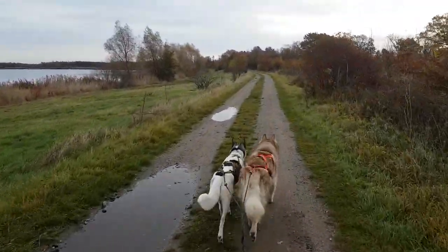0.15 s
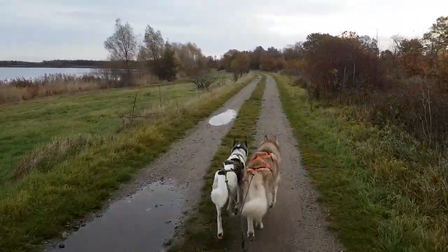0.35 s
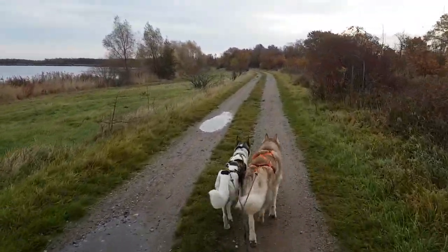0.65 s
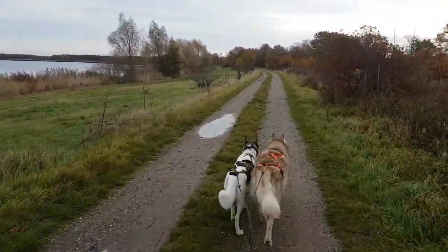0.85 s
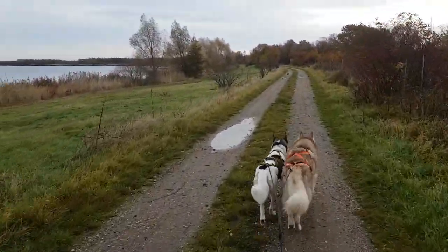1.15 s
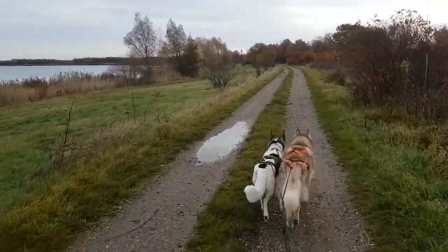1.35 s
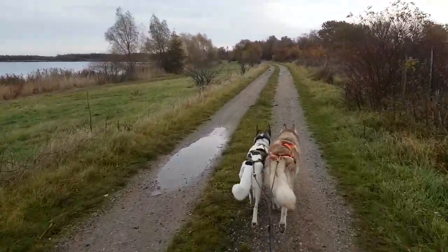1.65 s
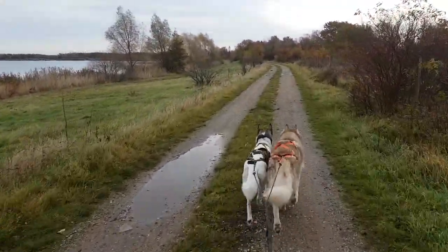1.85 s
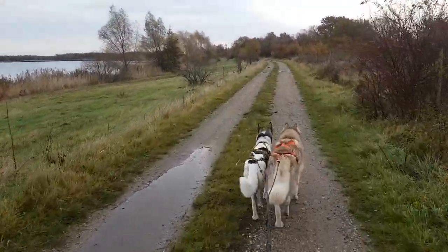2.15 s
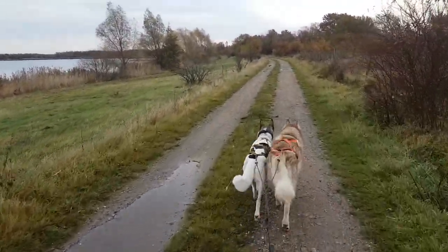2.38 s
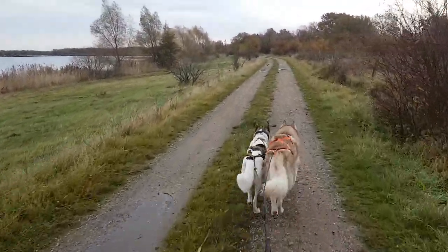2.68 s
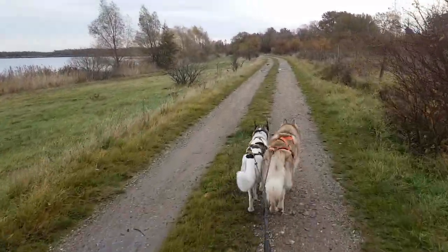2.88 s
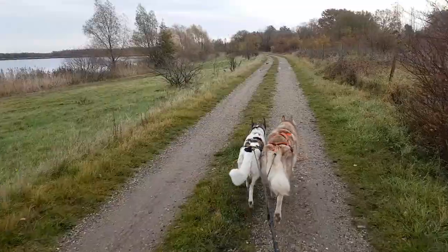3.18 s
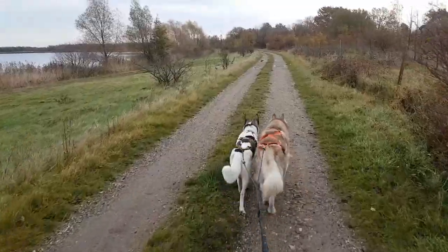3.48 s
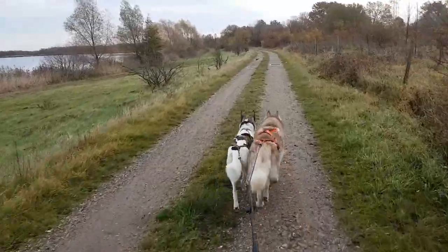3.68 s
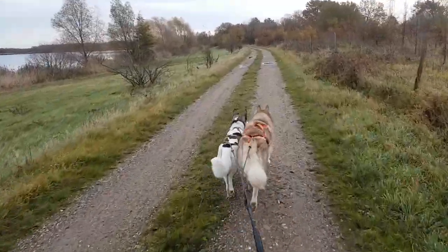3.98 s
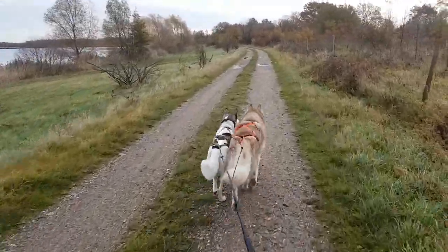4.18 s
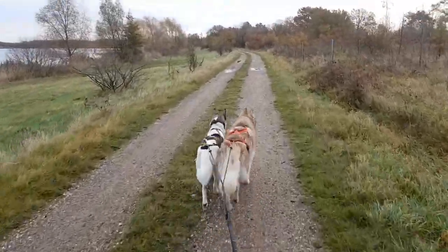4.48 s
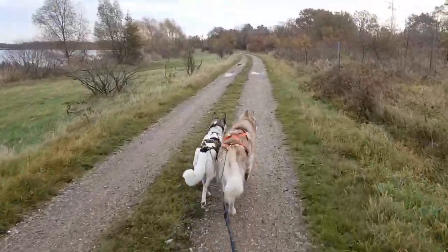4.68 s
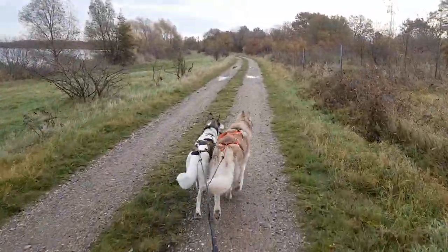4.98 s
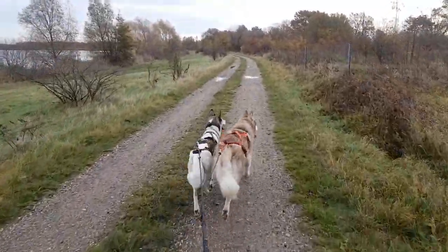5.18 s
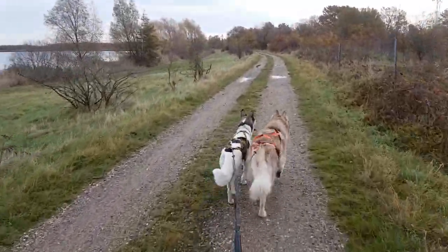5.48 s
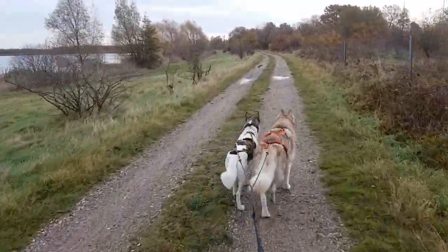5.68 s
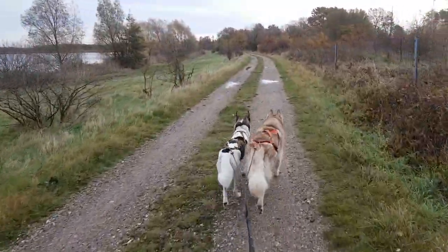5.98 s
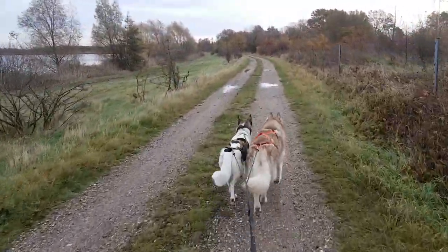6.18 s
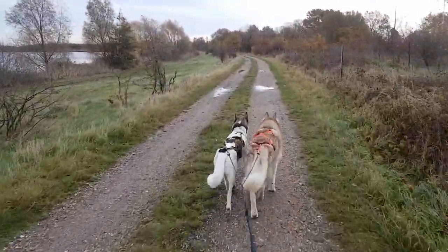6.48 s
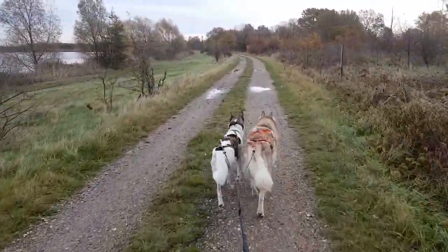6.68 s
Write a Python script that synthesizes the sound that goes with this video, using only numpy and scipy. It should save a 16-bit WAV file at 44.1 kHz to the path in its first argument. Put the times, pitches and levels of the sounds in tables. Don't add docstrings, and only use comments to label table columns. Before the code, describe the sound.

Continuous gritty gravel crunch under rolling wheels, peppered with sharp clicks and snaps, faint dull thuds and low fluttering air.

```python
import sys
import numpy as np
from scipy import signal
from scipy.fft import rfft, irfft, next_fast_len
from scipy.io import wavfile
from scipy.ndimage import map_coordinates

SR = 44100
rng = np.random.default_rng(int(sys.argv[2]) if len(sys.argv) > 2 else 0)


def field_ratio(decibels):
    return 10 ** (np.asarray(decibels, dtype=float) / 20)


def bounce(signal):
    frames = np.transpose(np.atleast_2d(signal))
    limited = np.clip(frames, -1, 1)
    pcm = np.round(limited * 32767).astype(np.int16)
    wavfile.write(sys.argv[1], SR, pcm)


N = 302085

# time in seconds, crunch level in dB.
LOOSE_GRAVEL = [(0.0, -52), (0.18, -48), (0.25, -45.5), (0.85, -49.5), (1.05, -53), (1.3, -59), (1.42, -48),
                (1.6, -50), (1.95, -45.5), (2.5, -45.5), (2.85, -44.5), (3.05, -47.5), (3.4, -42),
                (4.15, -46.5), (4.75, -47), (4.9, -43), (6.0, -46), (6.85, -41)]
# start in seconds, peak in dB, pitch of the ring in Hz.
BIG_STONES = [(0.3126, -18, 2070), (0.3782, -21, 3320), (0.41, -22, 3340), (1.692, -22.5, 4110),
              (1.9068, -19, 3280), (1.9665, -16, 2460), (2.0186, -19.5, 3660), (2.0785, -21, 2480),
              (2.1017, -21, 2430), (2.3181, -18, 3350), (2.3202, -13.5, 1020), (2.3237, -17.5, 3300),
              (2.4668, -11.5, 2460), (2.6475, -26, 3830), (2.789, -22.5, 1900), (2.791, -16, 5340),
              (2.8823, -20.5, 2370), (2.9864, -21, 3400), (3.22, -20.5, 3200), (3.293, -23.5, 2400),
              (3.384, -19, 2960), (3.4542, -21, 2670), (3.58, -14, 3180), (4.0823, -19, 4350),
              (4.1761, -21, 4360), (4.8142, -20, 1480), (4.9492, -22, 3100), (5.2, -22, 1950),
              (6.433, -22, 2200), (6.4355, -15, 2860)]
# start in seconds, peak in dB.
SMALL_STONES = [(0.2532, -28.5), (0.5545, -25), (1.39, -25), (1.4647, -25), (1.5294, -21), (1.737, -32),
                (1.8742, -29), (2.2176, -20), (2.4544, -23), (2.6035, -25), (2.6318, -21), (2.7385, -27),
                (2.8322, -25), (2.926, -23), (3.146, -23), (3.6809, -33), (3.796, -22.5), (3.9024, -22.5),
                (4.3697, -26), (4.5533, -24), (4.6562, -25), (5.5056, -30), (5.6761, -21), (5.8157, -25.5),
                (6.0898, -22.5), (6.273, -27), (6.3117, -23), (6.5985, -22), (6.7273, -23), (6.8045, -27.5)]
# start in seconds, peak in dB, length in seconds.
CRUMBLING = [(0.378, -25, .006), (0.415, -32.5, .009), (1.519, -30.5, 0.03), (1.677, -25.5, 0.026),
             (2.096, -24.5, 0.017), (2.308, -24, 0.015), (2.472, -29, 0.011), (2.958, -28, 0.011),
             (2.98, -29, .015), (3.286, -27.5, 0.017), (3.155, -28.5, 0.0077), (5.486, -33.5, 0.047),
             (6.26, -28.5, 0.013), (1.381, -31, .014), (3.364, -34, 0.062), (6.207, -29.5, .025),
             (1.953, -28.5, 0.028)]
# frequency in Hz, left-right likeness (1 is the same).
PORT_LIKENESS = [(300, 1), (1050, 0.85), (1800, 0.33), (2300, 0.76), (3400, 0.82), (4300, 0.4),
                 (5500, 0.23), (8000, 0.075)]


def unit(x):
    return x / np.sqrt(np.mean(x ** 2) + 1e-20)


def along(points, hz):
    f, v = np.transpose(points)
    return np.interp(np.log(hz + 1), np.log(f + 1), v)


def wobble(rate):
    return map_coordinates(rng.standard_normal(int(N * rate / SR) + 4), [np.arange(N) * rate / SR])


def swells(rows):
    out = np.zeros(N)
    for s, db, width in rows:
        first = max(0, round((s - 3 * width) * SR))
        last = min(N, round((s + 3 * width) * SR))
        near = np.arange(first, last)
        out[near] += db * np.exp(-.5 * ((near / SR - s) / width) ** 2)
    return out


def causal(spectrum, size):
    cepstrum = irfft(np.log(field_ratio(along(spectrum, np.fft.rfftfreq(size, 1 / SR)))), size)
    cepstrum[1:size // 2] *= 2
    cepstrum[size // 2 + 1:] = 0
    return np.exp(rfft(cepstrum))


def heard(pair, spectrum, alike):
    size = 2 * next_fast_len(pair.shape[1] // 2 + 4096)
    hz = np.fft.rfftfreq(size, 1 / SR)
    turn = np.arccos(np.clip(along(alike, hz), -1, 1)) / 2
    mid, side = rfft(pair, size) * causal(spectrum, size) * [np.cos(turn), np.sin(turn)]
    return irfft(np.array([mid + side, mid - side]), size)[:, :pair.shape[1]]


def contacts(per_second, spread_db, t60, clump, bed):
    chance, size = rng.random((2, N))
    starts = (chance < per_second * clump / SR) * field_ratio(-spread_db * np.log(size + 0.068))
    fade = field_ratio(-60 / (t60 * SR))
    bursts = unit(signal.lfilter([1], [1, -fade], starts))
    swell = np.sqrt(bursts ** 2 + bed * np.sqrt(clump))
    return swell * rng.standard_normal((2, N))


def looseness():
    # centre in seconds, change in dB, width in seconds.
    hard_patches = [(.15, -4.5, 0.025), (.66, -1.5, 0.049), (1.6, -4, .04), (1.43, -3.5, 0.014),
                    (2.28, -1.5, 0.046), (2.54, -4, 0.027), (2.95, -4, 0.008), (3.34, -6, 0.023),
                    (3.53, -5, 0.047), (3.74, -1.5, 0.023), (4.0, -3, 0.027), (4.21, -6, .02),
                    (4.345, -7, 0.017), (4.58, -2, 0.046), (4.78, -9, 0.024), (5.1, -2.5, 0.084),
                    (5.31, -6, 0.038), (5.6, -2.5, 0.09), (6.02, -8, 0.02), (6.15, -3.5, 0.011),
                    (6.38, 0, 0.026), (6.66, -3, 0.067), (6.85, -5.5, 0.038), (1.72, 0.5, 0.013),
                    (3.96, -0.5, .03), (5.06, 2, 0.014), (.35, -2, .02), (.49, -0.5, .03)]
    grind_s, grind_db, grind_from_db = 0.006, 0.1855, -26.5
    rises = []
    for s, db, *_ in [*BIG_STONES, *SMALL_STONES]:
        rises.append((s, grind_db * (min(db, -20) - grind_from_db), grind_s))
    for s, _, length in CRUMBLING:
        rises.append((s + length / 2, 1.5, length / 2 + 0.0035))
    lie_s, lie_db = np.transpose(LOOSE_GRAVEL)
    lie = np.interp(np.arange(N) / SR, lie_s, lie_db)
    uneven = 1.05 * wobble(12)
    crunch_db = lie - .8 + uneven + swells(rises) + swells(hard_patches)
    grit_db = -54.5 + 0.31 * (crunch_db + 48) + 0.55 * wobble(3.2)
    return crunch_db, grit_db


def crunch(crunch_db, grit_db):
    # frequency in Hz, level in dB per Hz.
    gravel_tone = [(290, -51.5), (500, -11), (794, -14.5), (1060, -10), (1420, -8.5), (1890, -5.5),
                   (2280, 1), (2600, -2), (3000, 1.5), (3450, 0.5), (3900, -3.5), (6200, -14.5),
                   (6900, -24), (16000, -24)]
    grit_tone = [(3000, -42), (5000, 0), (6300, 0.5), (7200, -1.5), (9000, 1), (10500, -1), (12500, -13),
                 (16000, -29)]
    dust_tone = [(8000, -32), (11000, -9), (12500, -2.5), (16000, -4)]
    clump = field_ratio(.8 * wobble(30) + 3.2 * wobble(75))
    coarse = fine = 0
    for tilt_db in (-4, 4):
        colour = [(hz, db + tilt_db * np.log2(hz / 2800)) for hz, db in gravel_tone]
        own = clump * field_ratio(2.2 * wobble(35))
        touches = contacts(520, spread_db=2.5, t60=0.002, clump=own, bed=0.69)
        coarse = coarse + heard(touches, colour, PORT_LIKENESS)
    for colour in (grit_tone, dust_tone):
        own = clump ** 0.65 * field_ratio(1.4 * wobble(30))
        touches = contacts(640, spread_db=10.5, t60=0.021, clump=own, bed=0.67)
        fine = fine + heard(touches, colour, [(8000, 0.025)])
    return field_ratio(crunch_db + 2.0) * unit(coarse) + field_ratio(grit_db + 0.5) * unit(fine)


def pebble_hz(z):
    return 3100 * np.exp(0.4 * z)


def cracks():
    first = [*BIG_STONES]
    for (s, db), z in zip(SMALL_STONES, rng.standard_normal(len(SMALL_STONES))):
        first.append((s, db, pebble_hz(z)))
    nudge_s, nudge_db, nudge_scatter_db = .014, -11.5, 4
    nudged = []
    for (s, db, _), (a, b, c) in zip(first, rng.standard_normal((len(first), 3))):
        peak_db = min(db, -20) + nudge_db + nudge_scatter_db * b
        nudged.append((s + nudge_s * a, peak_db, pebble_hz(c)))
    runs = []
    for s, db, length in CRUMBLING:
        for u, (a, b, c) in zip(np.linspace(0, 1, num=6), rng.standard_normal((6, 3))):
            peak_db = db - .7 - 6 * (u - .5) ** 2 + 1.3 * b
            runs.append((s + length * (u + .08 * a), peak_db, pebble_hz(c)))
    lie_s, lie_db = np.transpose(LOOSE_GRAVEL)
    strays = []
    for s, (b, c) in zip(rng.uniform(.01, 6.8, size=170), rng.standard_normal((170, 2))):
        strays.append((s, np.interp(s, lie_s, lie_db) + 15.5 + 2.5 * b, pebble_hz(c)))
    return first + nudged + runs + strays


def stones():
    # frequency in Hz, level in dB per Hz.
    crack_tone = [(300, -29), (800, -10), (1500, -6), (2300, 1), (2600, -1), (3000, 3), (3450, 3),
                  (4000, -2), (6000, -11), (8000, -19), (16000, -25)]
    drive, t = np.zeros((2, N + SR)), np.arange(1500) / SR
    rows = cracks()
    draws = rng.standard_normal((len(rows), 2, len(t)))
    for (s, db, hz), noise in zip(rows, draws):
        ring = np.cos(2 * np.pi * hz * t) * field_ratio(-60 * t * hz / 14)
        push = field_ratio(-60 * t / 0.00026) + 0.21 * ring
        splinters = noise * (0.14 * field_ratio(-60 * t / 0.006) + 0.054 * field_ratio(-60 * t / 0.071))
        off_centre = [[1], [noise[1, -1]]]
        start = round((s - .0002) * SR)
        drive[:, start:][:, :len(t)] += field_ratio(db + 7.5) * (off_centre * push + splinters)
    return heard(drive[:, :N], crack_tone, PORT_LIKENESS)


def knocks():
    # start in seconds, peak in dB, pitch of the ring in Hz.
    thuds = [(0.1365, -44.5, 724), (0.3121, -40, 1000), (0.4165, -46, 1060), (0.902, -40, 1000),
             (1.3927, -38, 905), (1.9067, -56, 890), (1.952, -39, 1060), (2.116, -34.5, 980),
             (2.2192, -42, 1060), (2.3192, -49, 1020), (2.4657, -62, 990), (2.788, -42, 1100),
             (3.3799, -34.5, 970), (3.5793, -56, 1040), (3.7405, -38, 676), (3.8898, -42, 740),
             (4.1807, -41, 630), (4.3697, -41, 955), (4.5396, -42, 845), (4.8153, -50, 1030),
             (4.9227, -37.5, 696), (5.0188, -41.5, 634), (6.2087, -45, 1020), (6.433, -50, 970)]
    out, t = np.zeros(N + SR), np.arange(SR // 50) / SR
    for s, db, hz in thuds:
        ring = np.sin(2 * np.pi * hz * t) * field_ratio(-60 * t * hz / 5)
        pull = 0.51 * np.sin(np.pi * hz * t) * field_ratio(-60 * t / 0.0042)
        out[round((s - .001) * SR):][:len(t)] -= field_ratio(db + 9) * (ring + pull)
    return out[:N]


def frame(shake):
    # pitch in Hz, level in dB.
    tubes = [(680, -9), (1050, -14), (1210, -10), (1570, -8.5), (1740, -9)]
    hz = np.fft.rfftfreq(N, 1 / SR)
    modes = 0
    for tube_hz, db in tubes:
        damping = 45j * hz
        modes = modes + field_ratio(db) * damping / (tube_hz ** 2 - hz ** 2 + damping)
    return irfft(rfft(shake.mean(axis=0)) * modes, N)


def spits():
    # start in seconds, peak in dB.
    sprays = [(0.3846, -41), (0.8296, -39), (1.3959, -42), (1.694, -40), (1.698, -40), (2.0777, -36),
              (2.1156, -40), (2.1878, -38), (2.1929, -40), (2.368, -33), (2.3736, -38), (2.4658, -38),
              (2.631, -39), (2.791, -39), (3.582, -40), (4.139, -35), (4.1765, -38), (4.4209, -42),
              (4.4309, -40), (4.7406, -42), (4.787, -42), (5.6532, -38), (4.93, -42), (6.47, -42),
              (3.42, -42), (5.915, -34), (5.917, -27.5), (5.921, -40), (6.0859, -40)]
    swell, t = np.zeros(N + SR), np.arange(SR // 20) / SR
    burst = t / 0.00089 * np.exp(1 - t / 0.00077) + field_ratio(-8.5 - 20 * t / 0.015)
    for s, db in sprays:
        swell[round((s - .0007) * SR):][:len(t)] += field_ratio(db) * burst
    colour = [(6500, -41), (9000, -4.5), (12000, -4), (16000, -5.0)]  # (Hz, dB per Hz)
    hiss = heard(rng.standard_normal((2, N)), colour, [(8000, 0.14)])
    return field_ratio(-3.0) * swell[:N] * unit(hiss)


def drum():
    # frequency in Hz, level in dB per Hz.
    hum_tone = [(150, -34), (230, -8), (330, 4), (420, -1.5), (560, -9.5), (900, -15), (1500, -19),
                (3000, -45)]
    # centre in seconds, dB over the usual hum, width in seconds.
    weight_swings = [(.43, 1, 0.028), (1.2, 2.5, 0.041), (2.0, 4.5, 0.033), (2.25, 5, 0.13),
                     (3.03, 3.5, 0.079), (3.57, 3, .06), (4.33, 3, 0.17), (4.9, 5.5, 0.05),
                     (5.28, 3.5, 0.043), (5.92, 4.5, 0.11), (6.65, 0, 0.11)]
    lumps = contacts(150, spread_db=4.0, t60=0.005, clump=0.86, bed=1.84)
    hum = unit(heard(lumps, hum_tone, [(250, 0.98), (600, 0.7)]))
    return field_ratio(-51.5 + swells(weight_swings) + 0.15) * hum


def buffet():
    # frequency in Hz, level in dB per Hz.
    wind_tone = [(12, -32), (25, -13.5), (60, -1.5), (105, -1), (200, -6.5), (350, -16), (600, -37),
                 (1500, -41)]
    # centre in seconds, dB over the calm, width in seconds.
    wind_gusts = [(.21, 5, 0.09), (.6, 7, 0.15), (1.21, 5.5, 0.088), (1.6, 9.5, 0.085), (1.74, 7, 0.033),
                  (1.87, 10.5, 0.074), (2.08, 4.5, 0.07), (2.43, 7, 0.1), (2.85, 10.5, 0.16),
                  (1.98, 6.5, 0.026), (3.28, 9.5, 0.054), (3.62, 12, 0.067), (3.86, 4, 0.033),
                  (4.86, 4, 0.019), (5.28, 10, 0.074), (5.53, 15, 0.034), (5.82, 3, 0.11), (6.2, 6, 0.17),
                  (6.48, 13.5, 0.037), (6.65, 10, 0.02), (6.85, 6, 0.035)]
    lumps = field_ratio(2.4 * np.array([wobble(17), wobble(17)]))
    rush = heard(rng.standard_normal((2, N)), wind_tone, [(60, 0.055), (200, 0.29)])
    return field_ratio(-58.5 + swells(wind_gusts) + 3.5) * unit(lumps * rush)


def scene():
    gravel = crunch(*looseness()) + stones() + knocks()
    return gravel + frame(gravel) + spits() + drum() + buffet()


def top_cut(x):
    return signal.sosfilt(signal.butter(12, 16830, fs=SR, output="sos"), x)


def record(dry):
    # frequency in Hz, left-right difference in dB.
    left_louder = [(60, 3.5), (125, 3.5), (330, -1.5), (1100, 1), (1700, -0.5), (2300, -4.5), (2900, -4),
                   (3800, 1), (5400, -4), (7200, -1), (10000, -4.5), (11300, -2), (14000, -5)]
    # frequency in Hz, lead in radians.
    left_lead = [(860, 0.03), (1980, -0.26), (3530, 1.0), (4650, -0.47), (5300, -1.9), (6000, -0.44)]
    size = next_fast_len(N + 4096)
    hz = np.fft.rfftfreq(size, 1 / SR)
    half = field_ratio(along(left_louder, hz) / 2) * np.exp(.5j * along(left_lead, hz))
    ports = irfft(rfft(dry, size) * np.array([half, 1 / half]) * (hz < 15900), size)[:, :N]
    return top_cut(ports - .0006)


dry = scene()
out = record(dry)
bounce(out)
```